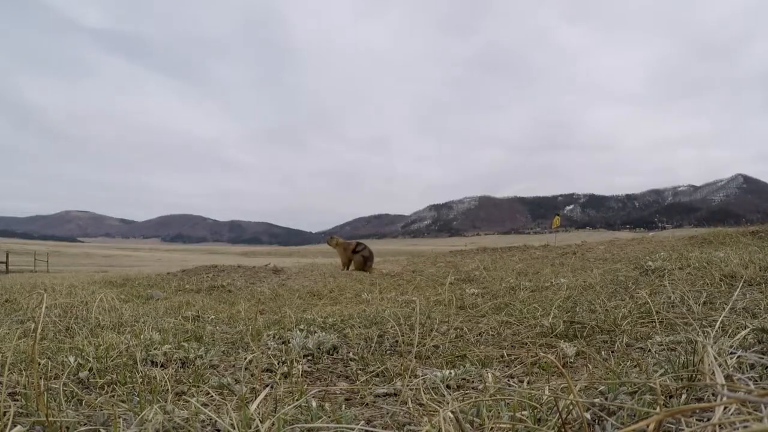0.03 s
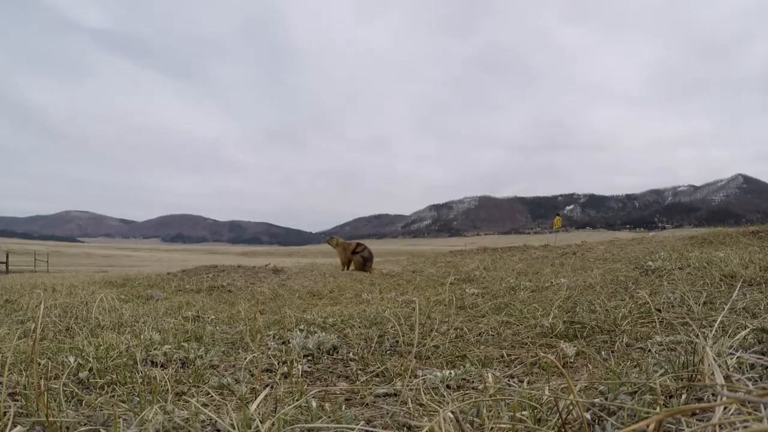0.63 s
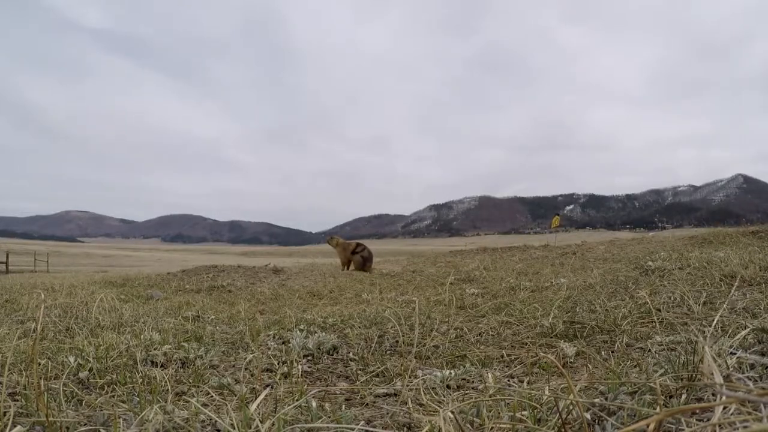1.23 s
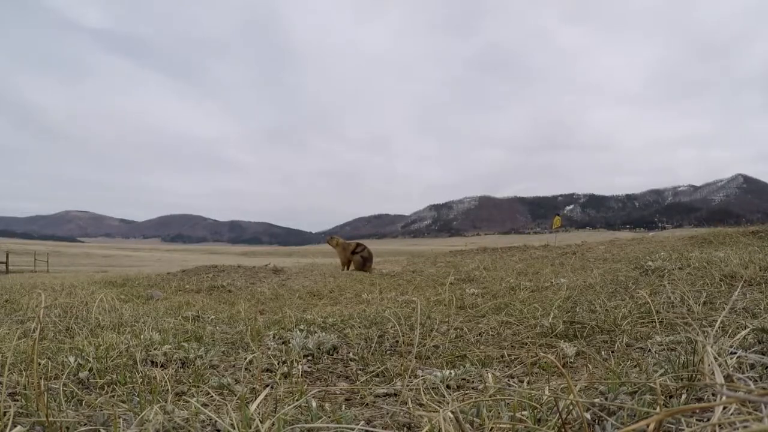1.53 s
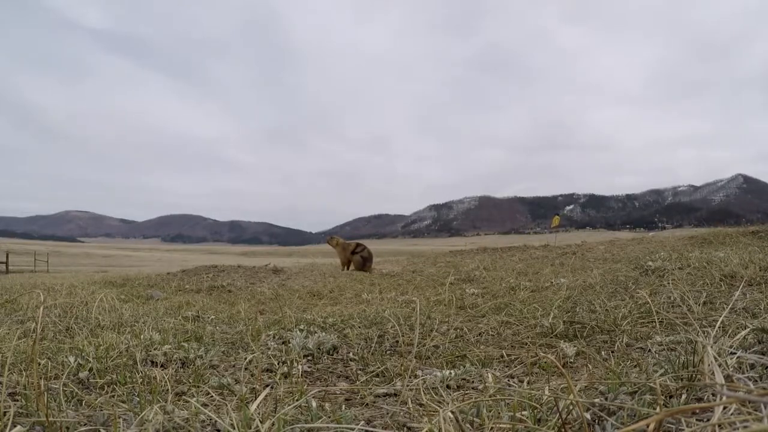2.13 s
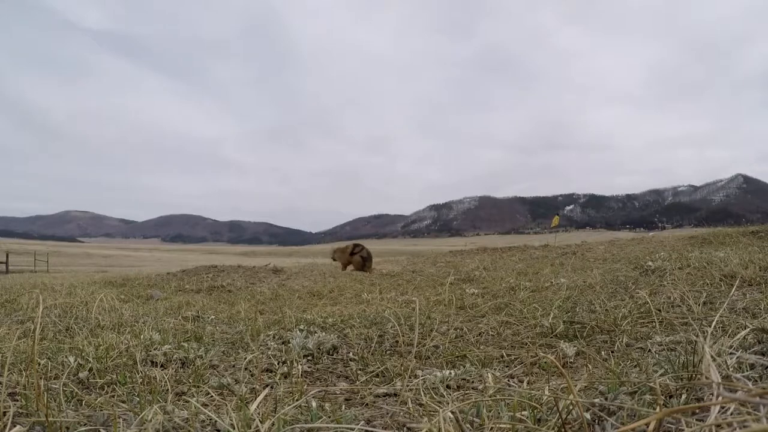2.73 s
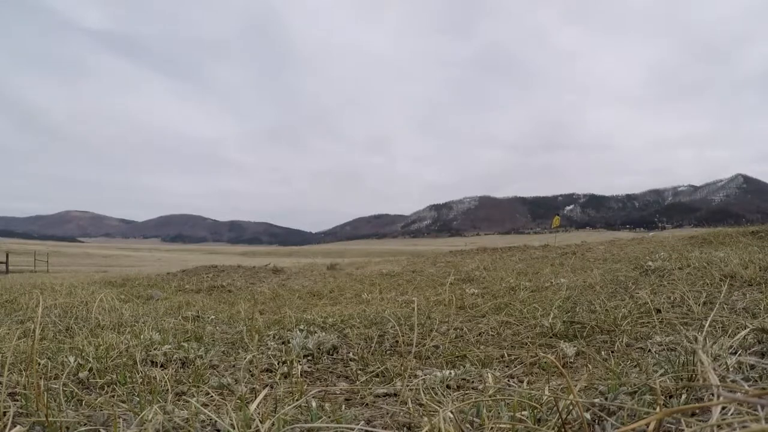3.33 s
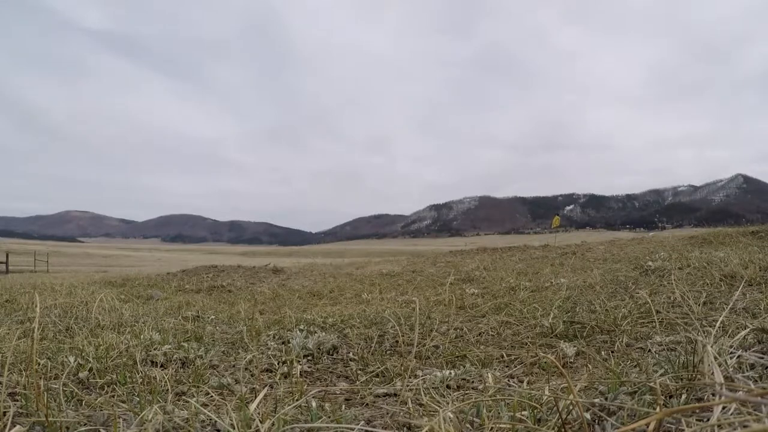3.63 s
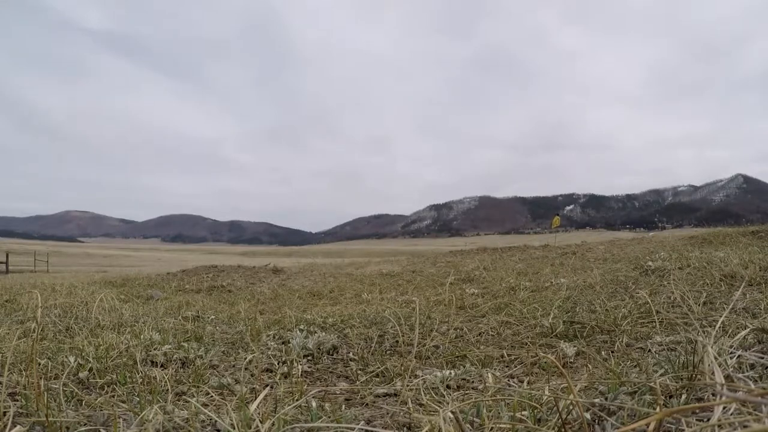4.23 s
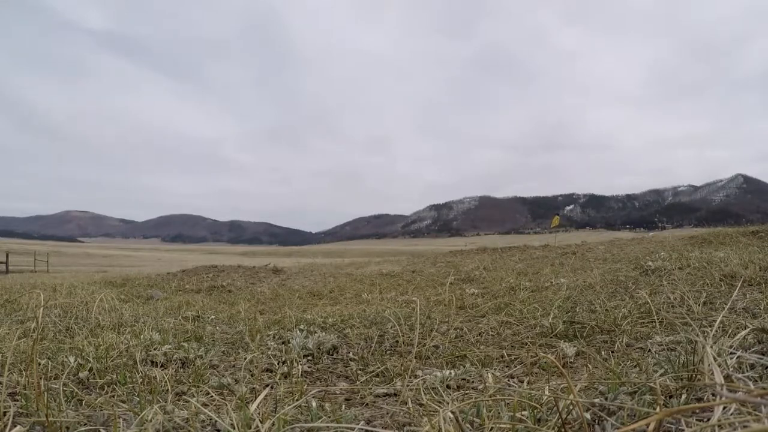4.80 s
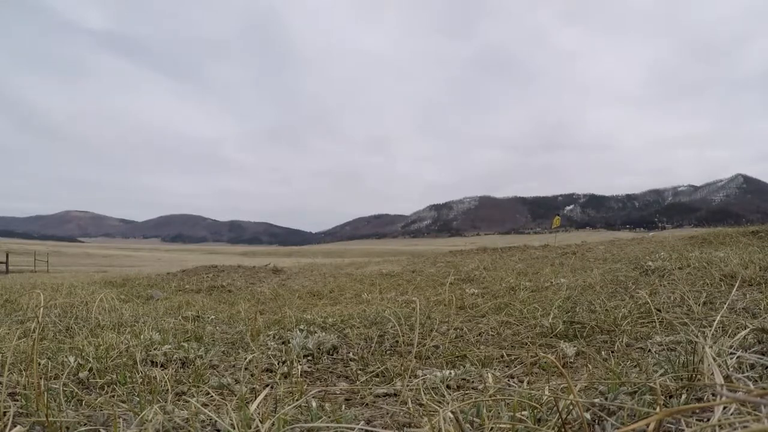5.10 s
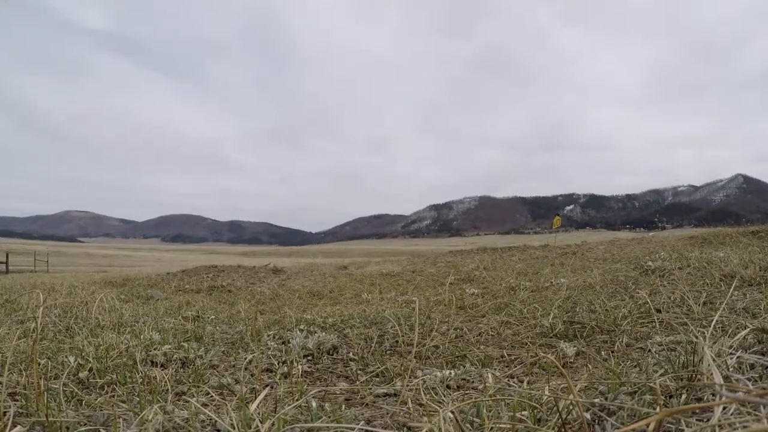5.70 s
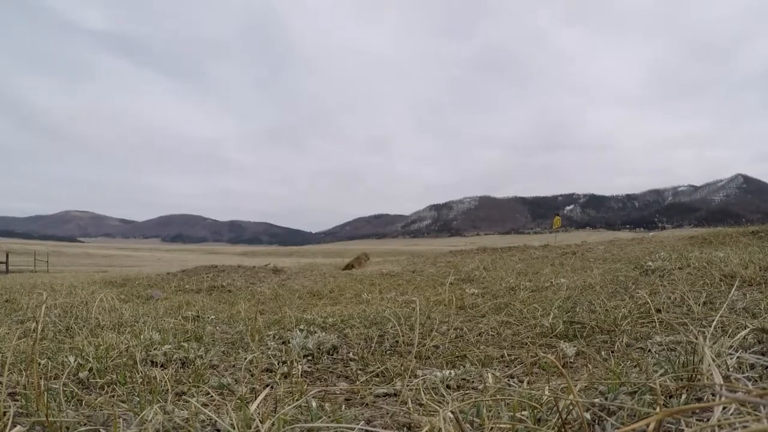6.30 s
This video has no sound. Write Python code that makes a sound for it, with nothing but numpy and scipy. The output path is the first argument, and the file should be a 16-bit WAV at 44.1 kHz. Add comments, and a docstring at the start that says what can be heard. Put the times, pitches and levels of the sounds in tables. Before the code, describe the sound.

A prairie dog gives four short, harsh barks in quick succession, each with two pulses, the last a little lower and cleaner. Louder gusts of wind buffet the microphone during the barks and keep returning afterwards, mostly on the left. In the lulls there is a soft rumble and hiss of breeze, a few faint ticks and a very faint low throb. The microphone lies in the grass of an open plain.

```python
"""A prairie dog gives four harsh, two-humped barks on open grassland. Each bark is two pushes of
breath: the vocal folds buzz, throat, mouth, ground and camera housing colour the buzz, and the grass
adds a tiny echo. Gusts buffet the two microphones of the camera lying in the grass, mostly the left
one. Between them come the soft rumble and hiss of the breeze, a few faint ticks, as of stems tapping
the housing, and a low, regular throb from the camera's own electronics."""
import sys
import numpy as np
from scipy import signal
from scipy.fft import rfft, irfft
from scipy.io import wavfile
from scipy.ndimage import uniform_filter1d, minimum_filter1d

SR = 44100
rng = np.random.default_rng(int(sys.argv[2]) if len(sys.argv) > 2 else 0)


def transcribe(u):
    """Save the signal u as a 16-bit wav file named by the first command-line argument.

    u: samples, shape (n,) or (channels, n), limited to [-1, 1]; the rate is SR.
    q: integer samples, one column per channel.
    """
    v = np.clip(np.atleast_2d(u).T, -1, 1)
    q = np.round(v * 32767).astype(np.int16)
    wavfile.write(sys.argv[1], SR, q)


N = 288855
TIME = np.arange(N) / SR
TREBLE_LIMIT_HZ = 10600


def gain_of(db):
    """Turns decibels into a number to multiply by."""
    return 10 ** (np.asarray(db) / 20)


def unit_level(x):
    """Scales a signal to an average power of 1."""
    return x / np.sqrt(np.mean(x ** 2) + 1e-20)


def curve_at(points, hz):
    """Looks up hz in rows of (frequency, value), gliding between the rows."""
    row_hz, value = np.transpose(points)
    return np.interp(np.log(hz + 1), np.log(row_hz + 1), value)


def frequencies(x):
    """The frequencies in Hz that make up the spectrum of x."""
    return np.fft.rfftfreq(x.shape[-1], 1 / SR)


def wobble(size, hz):
    """A smooth random wiggle, with changes up to about hz times a second."""
    noise = rng.standard_normal(size)
    return unit_level(irfft(rfft(noise) / (1 + (frequencies(noise) / hz) ** 4), size))


def sides(pan_db):
    """Left and right gains. Pan is how many dB louder the left side is than the right."""
    ratio = np.atleast_1d(gain_of(pan_db))
    return 2 * np.array([ratio, np.ones_like(ratio)]) / (1 + ratio)


def add(mix, start_s, sound):
    """Mixes in a stereo sound at start_s, dropping whatever falls outside the mix."""
    at = round(start_s * SR)
    sound = sound[:, max(-at, 0):]
    part = mix[:, max(at, 0):][:, :sound.shape[1]]
    part += sound[:, :part.shape[1]]


# How strong the throb is. Each row: time in seconds, level in dB.
THROB_LEVELS = [(0, -60), (0.8, -46), (1.3, -58), (1.9, -42), (2.15, -42), (2.5, -51), (3.2, -54),
                (3.7, -67), (5.9, -72), (6.3, -43), (6.55, -44)]

def electronic_throb(first_s=.042, period_s=.1024, uneven_db=2):
    """Electrical bursts, nearly ten a second, leak in as soft low bumps, each with a slower rebound."""
    t = (TIME - first_s + period_s / 2) % period_s - period_s / 2  # time from the nearest burst
    bump = np.exp(-(t / .0015) ** 2 / 2)
    rebound = .5 * np.exp(-((t - .008) / .004) ** 2 / 2)
    level_db = np.interp(TIME, *np.transpose(THROB_LEVELS)) + uneven_db * wobble(N, 13)
    return (bump - rebound) * gain_of(level_db) * sides(3)


# How alike the air is at the two microphones. Each row: frequency in Hz, likeness (1 same, -1 opposite).
AIR_LIKENESS = [(60, 0.88), (130, 0.36), (260, -0.18), (540, -0.49), (1100, -.7), (2400, -0.19),
                (5000, 0.031)]

def air_noise(tone):
    """Swirling air at two microphones; in the middle range it pushes one while it pulls the other."""
    left, unrelated = rfft(rng.standard_normal((2, N)))
    hz = frequencies(TIME)
    likeness = np.clip(curve_at(AIR_LIKENESS, hz), -1, 1)
    right = likeness * left + np.sqrt(1 - likeness ** 2) * unrelated
    return unit_level(irfft(np.array([left, right]) * gain_of(curve_at(tone, hz)), N))


# The tone of the breeze's rumble and of its hiss. Each row: frequency in Hz, relative level in dB.
RUMBLE_TONE = [(25, -14.5), (60, -19), (105, -23.5), (135, -5), (165, -0.5), (220, -4), (290, -11.5),
               (390, -17.5), (520, -23.5), (900, -33), (1300, -61.5)]
HISS_TONE = [(300, -8.5), (700, 4), (1200, 2.5), (2000, -9.5), (3000, -17), (5000, -23.5), (6600, -19),
             (8200, -22.5), (10000, -21.5)]
# How strong the breeze is. Each row: time in seconds, rumble level in dB.
BREEZE_LEVELS = [(0, -44), (0.5, -56.5), (0.8, -58), (1.2, -56), (2.1, -58), (2.6, -53), (3.3, -59.5),
                 (3.62, -53.5), (4.1, -73.5), (4.42, -78), (4.75, -55.5), (5.0, -60), (5.35, -50.5),
                 (5.8, -58.5), (6.3, -53.5), (6.55, -52.5)]

def breeze(lumpy_db=3, usual_rumble_db=-57, usual_hiss_db=-72, hiss_follows=0.28):
    """Air moving over the grass makes a lumpy low rumble and a thin hiss; both follow its strength."""
    strength_db = np.interp(TIME, *np.transpose(BREEZE_LEVELS))
    rumble = air_noise(RUMBLE_TONE) * gain_of(strength_db + lumpy_db * wobble(N, 8.2))
    hiss_db = usual_hiss_db + hiss_follows * (strength_db - usual_rumble_db)
    hiss = air_noise(HISS_TONE) * gain_of(hiss_db + 0.9 * wobble(N, 14))
    return rumble * sides(5.1) + hiss * sides(0.99)


# Faint taps. Each row: start in seconds, level in dB before the boost, pitch in Hz, pan in dB.
STEM_TICKS = [(2.0448, -63, 890, -5), (2.7608, -58.5, 1040, 19), (2.9773, -50.5, 1060, 18),
              (3.085, -69, 1080, 0), (3.2072, -63, 1130, 2), (3.6619, -57.5, 1270, 25),
              (3.734, -63, 1110, 25), (3.8401, -59.5, 1220, 36.5), (4.9258, -61, 1030, 11.5)]

def stem_tick(level_db, hz, pan_db, rise_s=0.0007, boost_db=2):
    """A light, dead tap, as of a grass stem on the housing."""
    t = np.arange(600) / SR
    envelope = t / rise_s * np.exp(1 - t / rise_s)
    return gain_of(level_db + boost_db) * envelope * np.sin(2 * np.pi * hz * t) * sides(pan_db)


# The gusts. Each row: time of reaching full strength in seconds, hold in seconds, level in dB,
# pan in dB, brightness (the share of higher sound) in dB.
GUST_EVENTS = [(0.024, 0.0041, -30.5, 35.5, -42), (0.155, 0.083, -23, 22, -10.5),
               (0.244, 0.02, -26.5, 23, -17.5), (0.354, 0.06, -30, 15, -13.5),
               (0.383, 0.054, -27.5, 17, -12.5), (0.571, 0.039, -29.5, 20, -23),
               (1.127, 0.0017, -34.5, 34.5, -15), (1.189, 0.082, -36, 31.5, -25.5),
               (1.388, 0.052, -25.5, 28, -28), (1.459, 0.081, -16.5, 7.5, -5.5),
               (1.545, 0.046, -24, 22.5, -18.5), (1.6, 0.062, -19.5, 11, -10.5),
               (1.677, 0.12, -31.5, 21, -25.5), (2.319, 0.05, -19.5, 18.5, -9.5),
               (2.389, 0.033, -29, 18.5, -17.5), (2.956, .015, -48, 13, -20), (3.603, 0.022, -48, 16, -26),
               (4.496, 0.0066, -22.5, 35.5, -39), (4.54, 0.035, -18, 22, -23.5),
               (4.68, 0.011, -19, 25, -13), (5.092, .028, -25.5, 22, -20.5), (5.135, 0.03, -23.5, 19, -10),
               (5.174, 0.059, -28, 20, -22), (5.382, 0.045, -27.5, 21.5, -17.5),
               (5.874, .03, -41, 27.5, -40), (5.909, 0.1, -24, 24.5, -15.5),
               (6.032, 0.068, -18, 23.5, -13.5), (6.114, 0.042, -24, 17, -24),
               (6.244, 0.0029, -27, 27.5, -40), (6.286, 0.0031, -25.5, 19.5, -35)]

def gust_curves(rise_db_per_s=1299.5, fall_db_per_s=1103, wake_db=-33, wake_db_per_s=231,
                wake_bright_db=-23.5):
    """The wind's level, pan and brightness in dB: each gust swells and dies inside a weak, dull wake."""
    power, pan_sum, bright_sum = np.zeros((3, N)) + 1e-14
    for full_s, hold_s, level_db, pan_db, bright_db in GUST_EVENTS:
        before, after = np.maximum(full_s - TIME, 0), np.maximum(TIME - full_s - hold_s, 0)
        core_db = level_db - rise_db_per_s * before - fall_db_per_s * after
        core = gain_of(np.maximum(core_db, -200)) ** 2
        wake = gain_of(level_db + wake_db - wake_db_per_s * (before + after)) ** 2
        power += core + wake
        pan_sum += (core + wake) * pan_db
        bright_sum += core * bright_db + wake * wake_bright_db
    return 10 * np.log10(power), pan_sum / power, bright_sum / power


# The tone of the buffeting. Each row: frequency in Hz, relative level in dB.
GUST_TONE = [(15, -61), (25, -22.5), (103, -26), (143, -6), (165, 2.5), (261, -2.5), (363, -13),
             (470, -18.5), (691, -35), (2000, -83.5), (2600, -109), (4400, -120)]

def gusts(usual_bright_db=-14, steadiness=0.56, centring=0.11, flutter_db=2.0, lumpy_db=4.0):
    """Swirls of air buffet the microphones; the smaller the swirls, the brighter the sound."""
    level_db, pan_db, bright_db = gust_curves()
    level_db = level_db + lumpy_db * wobble(N, 40)
    swirls = air_noise(GUST_TONE)
    # The wind's speed sets a gust's force, so chance swells in the noise are partly evened out.
    power = uniform_filter1d(uniform_filter1d(swirls ** 2, size=700), size=500)
    spectrum = rfft(unit_level(swirls / (power + 1e-9) ** (steadiness / 2)))
    octaves_up = np.clip(np.log2((frequencies(TIME) + 1) / 170), 0, 2)  # counted from 170 Hz
    db_per_octave = np.clip(bright_db - usual_bright_db, -20, 6) / 2
    db_per_octave += flutter_db * wobble(N, 71)  # small swirls come in bursts
    out = np.zeros((2, N))
    for octave in (0, 1, 2):
        band = irfft(spectrum * np.maximum(1 - abs(octaves_up - octave), 0), N)
        balance = sides(pan_db * (1 - centring * octave))  # small swirls reach both sides more evenly
        out += band * gain_of(level_db + octave * db_per_octave) * balance
    return out


# Swirls that stand out of the gusts. Each row: middle in seconds, relative level in dB,
# pitch in Hz, pan in dB.
WIND_SLAPS = [(0.181, -9.5, 260, 26), (0.237, -7.5, 340, 10.5), (0.391, -12, 280, 20),
              (0.411, -12.5, 270, 13), (1.234, -22, 290, 17), (1.468, -11.5, 300, 11),
              (1.523, -0.5, 320, 7.5), (1.623, -8.5, 330, 26), (1.792, -12.5, 150, 22),
              (2.321, -6, 340, 25.5), (2.352, -23.5, 695, 9.5), (2.356, -6, 230.4, 26),
              (3.456, -40.5, 280, 33), (4.555, -7, 190, 37), (4.684, -12, 303, 28), (5.137, -11.5, 240, 28),
              (5.216, -20, 230, 22.5), (5.419, -20.5, 420, 10), (5.997, -15.5, 380, 13),
              (6.021, -7.5, 430, 9), (6.075, -4.5, 300, 17), (6.104, -8, 280, 8)]

def wind_slaps(width_cycles=0.54, trim_db=-3, low_cut_hz=130):
    """Single swirls roll past: a swing or two of pressure pushes one microphone and pulls the other."""
    out, t = np.zeros((2, N)), np.arange(-700, 700) / SR
    for middle_s, level_db, hz, pan_db in WIND_SLAPS:
        envelope = np.exp(-(t * hz / width_cycles) ** 2 / 2)
        swing = envelope * np.cos(2 * np.pi * (hz * t + rng.random()))
        push_pull = sides(pan_db) * [[1], [-1]]
        add(out, middle_s + t[0], gain_of(level_db + trim_db) * swing * push_pull)
    wind_filter = signal.butter(2, low_cut_hz, "highpass", fs=SR, output="sos")  # the microphone's own
    return signal.sosfilt(wind_filter, out)


def vocal_folds(hz, harsh, alternation=.75, limp=.15, jitter=.012, rasp=.13):
    """The folds snap out sharp pulses; a harsh voice makes them uneven and adds more breath noise."""
    cycles = np.cumsum(hz * (1 + jitter * harsh * wobble(len(hz), 260))) / SR
    cycles += limp * harsh * np.cos(np.pi * cycles - np.pi / 4)  # every other pulse comes early
    pulses = sum(np.cos(2 * np.pi * harmonic * cycles) * (harmonic * hz < TREBLE_LIMIT_HZ)
                 for harmonic in np.arange(1, TREBLE_LIMIT_HZ // 400))
    strong_weak = alternation * harsh * np.cos(np.pi * cycles)
    pulses *= 1 + strong_weak + .22 * harsh * wobble(len(hz), 300)
    puffs = (0.27 + np.exp(-(cycles % 1) / .3)) * rng.standard_normal(len(hz))  # one puff per pulse
    breath_db = curve_at([(1000, -5), (3500, -1), (7000, 5)], frequencies(hz))  # mostly treble
    breath = irfft(rfft(unit_level(puffs)) * gain_of(breath_db), len(hz))
    return unit_level(pulses) + (.06 + rasp * harsh) * breath


# The tone of the barks across the grass. Each row: frequency in Hz, boost or cut in dB.
BARK_TONE = [(350, 5.5), (600, 9.5), (1000, 7), (1280, -2.5), (1750, 12), (2550, 1), (2880, -4),
             (3300, 2.5), (4100, -1.5), (4650, 1), (5600, -6), (6900, 11), (8000, -11), (9800, -12)]

def bark_colour(buzz, tilt_db_per_octave):
    """The barks' tone, shaped by throat, ground and camera housing, rings briefly after each pulse."""
    hz = frequencies(buzz)
    tone_db = curve_at(BARK_TONE, hz) + tilt_db_per_octave * np.log2((hz + 100) / 3000)
    log_gain = np.log(gain_of(tone_db))
    # This phase puts the ringing after each pulse, never before it.
    phase = -signal.hilbert(np.r_[log_gain, log_gain[-2:0:-1]]).imag[:len(hz)]
    return irfft(rfft(buzz) * np.exp(log_gain + 1j * phase), len(buzz))


def mouth_ring(voice, hz, width_hz, lift_db):
    """Air in the mouth rings at the gliding frequency hz; added to the voice, it lifts that band."""
    spin = np.exp(2j * np.pi * np.cumsum(hz) / SR)
    decay = np.exp(-np.pi * width_hz / SR)
    band = 2 * (spin * signal.lfilter([1 - decay], [1, -decay], voice / spin)).real
    return (gain_of(lift_db) - 1) * band


# Which side each part of a bark leans to. Each row: frequency in Hz, pan in dB.
BARK_SIDES = [(500, 12.5), (1050, -4), (1840, 3.5), (3250, -0.5), (5700, -5), (10000, -19)]

def grass_echo(voice, scatter=0.7, fade_s=0.0043):
    """Grass blades scatter a few milliseconds of echo, different at each microphone."""
    voice = np.pad(voice, (0, 1024))
    delay_s = np.arange(900) / SR
    blades = rng.standard_normal((2, len(delay_s))) * np.exp(-delay_s / fade_s)
    echo = signal.fftconvolve(voice[None], blades / np.linalg.norm(blades[0]), axes=1)[:, :len(voice)]
    balance = sides(curve_at(BARK_SIDES, frequencies(voice)))
    return irfft(rfft(voice + scatter * echo) * balance, len(voice))


FIRST_CREST, SECOND_CREST = .225, .715  # where the pushes peak, as shares of the bark's length
SLACK_SAG, SLACK_DB, SLACK_HARSH = .21, -11.5, .35  # between pushes: pitch lost, dip, harshness left
CLOSE_S, CLOSE_SAG = .012, .1  # as the throat closes, the pitch drops by a further share
ATTACK_S, RELEASE_S = 0.0082, 0.0095
# The barks. Each row: start and length in seconds, first and second push's pitch in Hz, their two
# levels in dB, harshness from 0 to 1, the mouth's ring in Hz, its width in Hz, its lift in dB,
# treble tilt in dB per octave.
PRAIRIE_DOG_BARKS = [(-0.018, 0.1, 708.5, 668, -39, -39.5, .9, 3200, 390, 12, 0),
                     (0.182, 0.11, 671.5, 693, -40, -40, 1, 3540, 200, 11, -1),
                     (0.366, 0.11, 654.6, 628, -40.5, -42, 1, 3530, 130, 11, .5),
                     (0.581, 0.14, 622, 559, -40, -46, 0.1, 3960, 400, 17.5, 0)]

def bark(length_s, first_hz, second_hz, first_db, second_db, harshness,
         mouth_hz, width_hz, lift_db, tilt_db_per_octave):
    """Two pushes of effort: with each, pitch, level and harshness rise and the mouth opens."""
    t = np.arange(0, length_s, 1 / SR)
    progress = (t / length_s - FIRST_CREST) / (SECOND_CREST - FIRST_CREST)  # 0, then 1, at the crests
    slack = np.sin(np.pi * progress) ** 2
    to_second = np.sin(np.pi / 2 * np.clip(progress, 0, 1)) ** 2
    closing = 1 - CLOSE_SAG * np.exp((t - length_s) / CLOSE_S)
    hz = (first_hz + (second_hz - first_hz) * to_second) * (1 - SLACK_SAG * slack) * closing
    effort_db = first_db + (second_db - first_db) * to_second + SLACK_DB * slack
    harsh = np.clip(harshness * (1 - (1 - SLACK_HARSH) * slack), 0, 1)
    voice = bark_colour(vocal_folds(hz, harsh), tilt_db_per_octave)
    opening = (hz / hz.max()) ** .38  # both rings of the mouth rise with the pitch, but by less
    lower_ring = mouth_ring(voice, mouth_hz * opening, width_hz, lift_db)
    upper_ring = mouth_ring(voice, hz=4696 * opening, width_hz=130, lift_db=8.5)
    fade = np.minimum(t / ATTACK_S, 1) * np.minimum((length_s - t) / RELEASE_S, 1)
    return grass_echo(unit_level(voice + lower_ring + upper_ring) * gain_of(effort_db) * fade)


def scene():
    """Barks and faint ticks over the wind and the throb."""
    mix = gusts() + wind_slaps() + breeze() + electronic_throb()
    for start_s, *settings in PRAIRIE_DOG_BARKS:
        add(mix, start_s, bark(*settings))
    for start_s, *settings in STEM_TICKS:
        add(mix, start_s, stem_tick(*settings))
    return mix


def record(dry):
    """A limiter turns down the strongest buffets so they fit; then the highest treble is cut."""
    safe_gain = np.minimum(.92 / (abs(dry).max(0) + 1e-9), 1)
    held_gain = minimum_filter1d(safe_gain, size=801)
    smooth_gain = uniform_filter1d(uniform_filter1d(held_gain, size=401), size=401)
    treble_cut = signal.firwin(201, TREBLE_LIMIT_HZ, window=("kaiser", 8), fs=SR)
    return signal.oaconvolve(dry * smooth_gain, treble_cut[None], "same")


dry = scene()
out = record(dry)
transcribe(out)
```